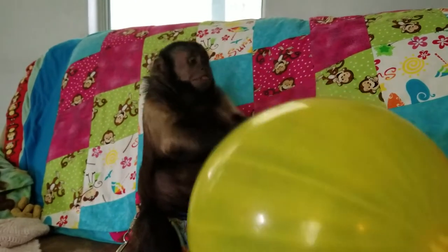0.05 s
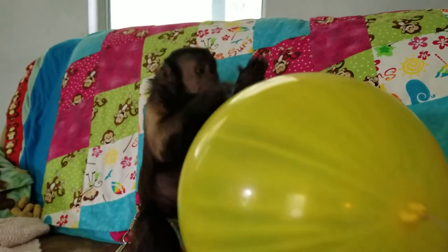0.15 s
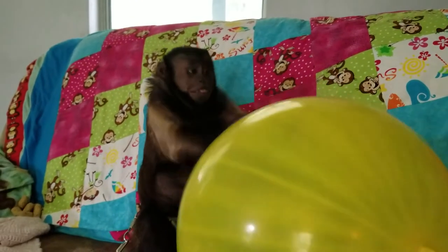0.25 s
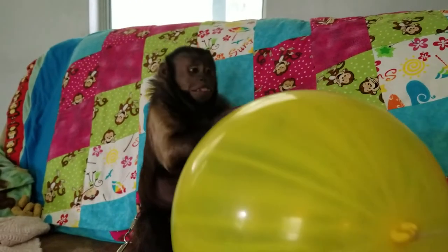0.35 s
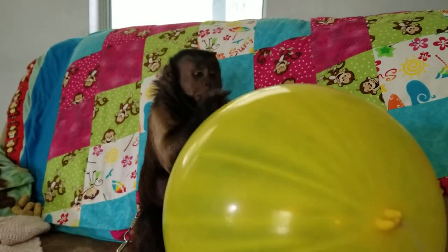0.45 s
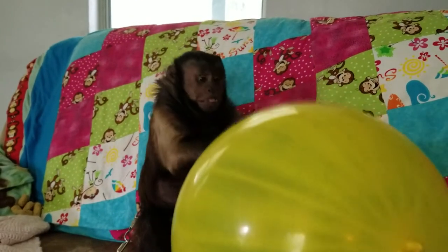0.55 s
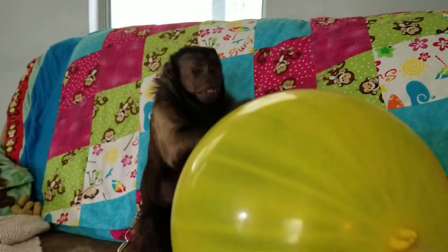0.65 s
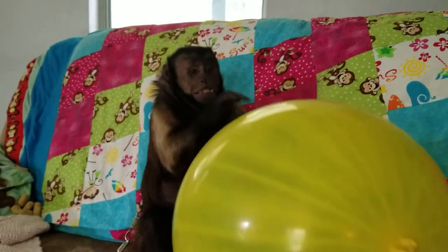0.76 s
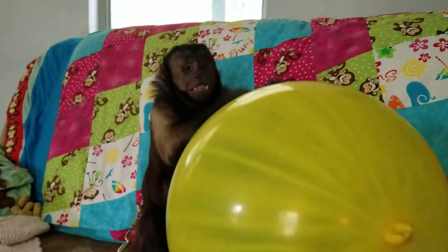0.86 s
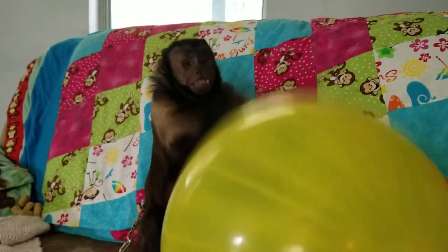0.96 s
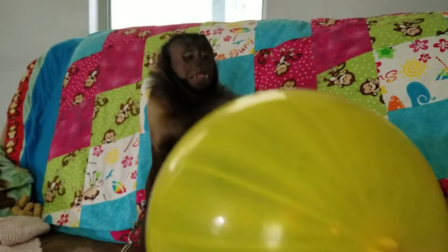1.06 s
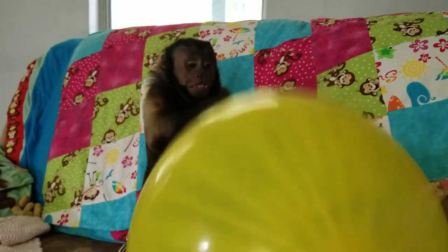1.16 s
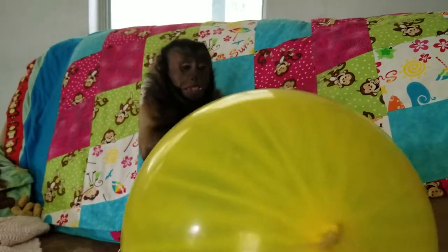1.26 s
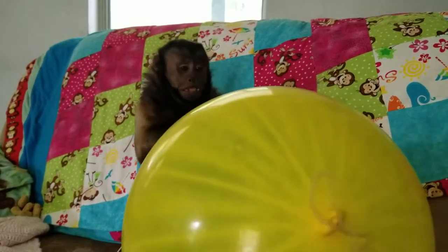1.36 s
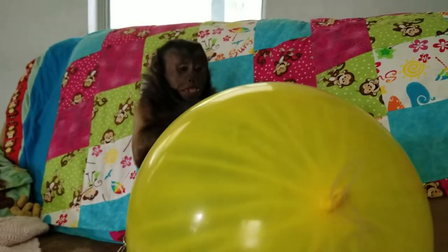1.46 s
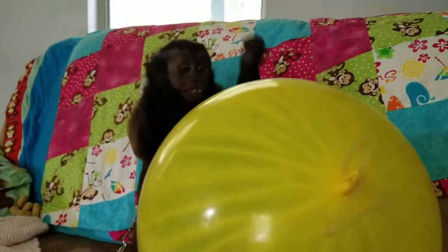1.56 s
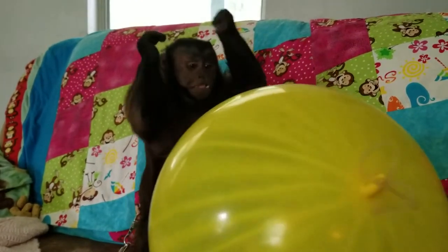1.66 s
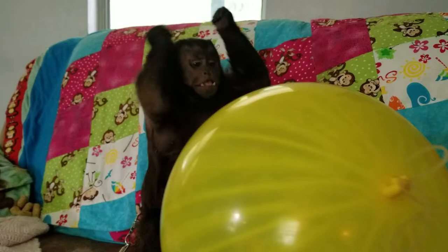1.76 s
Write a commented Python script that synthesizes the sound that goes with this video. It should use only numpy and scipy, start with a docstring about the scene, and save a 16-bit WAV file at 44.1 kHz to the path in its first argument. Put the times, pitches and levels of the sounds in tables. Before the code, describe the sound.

A big latex balloon thumps and scrapes close up as a monkey paws it. A strong hollow thump with rubbery snaps lands at about 0.25 seconds, followed by softer pats and rubs from 0.5 to 0.9. More ringing shoves come around 1 second, and another strong thump with scraping and snaps at 1.2. Light knocks follow near 1.5 seconds, leaving faint room hiss and hum.

```python
"""Hollow, rubbery thumps and scrapes, close up: a monkey paws a big latex balloon on a couch.
Each shove thumps the skin and rings the balloon's low modes. Fur and fingers scrape over the latex in
tiny slips that shake the skin and ring the air inside, and now and then a fingertip snaps free.
Underneath lie the steady hiss and faint hum of a small living room."""
import sys
import numpy as np
from scipy import signal
from scipy.fft import rfft, irfft
from scipy.io import wavfile
from scipy.ndimage import uniform_filter1d

SR = 44100
rng = np.random.default_rng(int(sys.argv[2]) if len(sys.argv) > 2 else 0)


def store_wav(level_fs):
    """Save 16-bit WAV to argv[1]."""
    pcm = np.round(np.clip(np.atleast_2d(level_fs), -1, 1) * 32767)
    wavfile.write(sys.argv[1], SR, pcm.T.astype(np.int16))


N = 79380

# Tone of the room's hiss. Each row: frequency in Hz, relative level in dB.
HISS_SPECTRUM = [(20, -25), (60, -1.5), (110, -1.5), (170, -10), (235, -5), (370, -12.5), (700, -8),
                 (1200, -7), (1900, -12), (2700, -8.5), (4000, -14.5), (5700, -25), (9000, -32),
                 (15500, -39)]
# Strokes over the latex. Each row: peak time, rise and fall in seconds, then relative scrape level,
# treble tilt and relative skin shake in dB.
PAW_STROKES = [(0.038, 0.033, 0.047, -38.5, 1, -36.5), (0.09, 0.018, 0.022, -42.5, 0, -55),
               (0.232, 0.014, 0.037, -37, 4, -31.5), (0.277, 0.017, 0.019, -27.5, 1, -30.5),
               (.315, 0.0057, 0.0069, -56, -5, -36), (0.363, 0.0045, 0.027, -43.5, -8, -39),
               (0.527, 0.024, 0.035, -45, 9, -36.5), (0.573, 0.026, 0.017, -36.5, 2.5, -33.5),
               (.665, 0.088, 0.065, -50, -7, -49), (0.754, 0.03, 0.033, -42, 2, -40.5),
               (0.798, 0.016, 0.022, -54, 10, -47), (0.868, 0.017, 0.025, -48, 3.5, -43),
               (0.979, 0.025, 0.02, -34, 1.5, -24.5), (0.994, 0.016, 0.04, -43, 6, -39),
               (1.172, 0.025, 0.035, -39, 10, -30), (1.202, 0.02, 0.022, -29, 5.5, -44.5),
               (1.241, 0.012, 0.0064, -34, -10, -31), (1.308, 0.02, 0.04, -53, -12, -42),
               (1.429, 0.018, 0.037, -48.5, -1, -58.5)]
# Tone of the shaken skin. Each row: frequency in Hz, relative level in dB.
RUMBLE_SPECTRUM = [(20, -11), (45, 6.5), (75, 2), (110, -2.5), (170, -4.5), (235, -4), (310, -7),
                   (400, -14.5), (560, -10), (900, -39.5), (2000, -42)]
# Tone of the slips on latex. Each row: frequency in Hz, relative level in dB.
SLIP_SPECTRUM = [(150, -31), (390, 1), (540, 8.5), (950, 5.5), (1300, 3), (2000, 2), (3000, 1.5),
                 (5000, -5), (8000, -11.5), (12000, -14), (16000, -16.5)]
# Resonances of the enclosed air. Each row: frequency in Hz, relative level in dB.
AIR_MODES = [(504, -18), (677, -0.5), (867, -11), (983, -4), (1156, -2), (1359, -1), (1795, 6), (1925, -3),
             (2364, -8), (2741, -4), (3062, -22)]
# Fingertips snapping free. Each row: start in seconds, ring level in dB, the ring's low-pass cutoff
# in Hz, crack level in dB.
FINGER_SNAPS = [(0.2632, -38, 4000, -48), (.2925, -34, 1600, -54), (.313, -39.5, 1600, -48),
                (0.3602, -34.5, 910, -46), (0.573, -34, 2800, -49), (0.9589, -36.5, 1000, -47),
                (0.9724, -30, 3660, -60), (1.19, -42, 3000, -35), (1.202, -27.5, 4000, -49),
                (1.2153, -29.5, 2000, -47), (1.2393, -29.5, 1760, -42), (1.2857, -29, 3600, -46.5),
                (1.536, -41.5, 1000, -70)]
# The taut patch under a fingertip. Each row: frequency in Hz, relative level in dB, T60 in seconds.
PATCH_MODES = [(634, -6, 0.019), (970, -6, 0.015), (1620, 1.5, 0.0063), (2200, 4, 0.0049),
               (2940, -11, 0.012)]
# Light knocks on the balloon. Each row: start in seconds, level in dB.
LIGHT_KNOCKS = [(.034, -29), (1.43, -40.5), (1.5394, -35.5)]
# Shoves and pats. Each row: start in seconds, overall level in dB, swing of the skin in Hz,
# ring level in dB relative to the overall level.
SHOVES = [(0.035, -29.5, 192, -2), (0.054, -34, 79.6, 2.5), (0.132, -33.5, 106, 3.5),
          (0.2236, -20.5, 131, -8), (0.2519, -9, 142.6, -5), (0.2613, -20, 190, 0), (0.31, -29, 164, -10),
          (0.522, -26, 145, -2.5), (.573, -23.5, 62, -2.5), (.606, -36.5, 151, 1), (.658, -34.5, 64, -4),
          (0.746, -24.5, 115, -13), (0.763, -31.5, 53, 1.5), (0.9596, -19, 126, -4),
          (0.9762, -20, 148, 2.5), (.982, -25, 61, 5.5), (1.028, -23, 150, 1.5), (1.047, -30, 66, -3.5),
          (1.157, -21, 150, -10), (1.1791, -8, 146, -5), (1.222, -21.5, 62, -10), (1.258, -28.5, 99.5, -19),
          (1.313, -31, 148, -29), (1.385, -37.5, 161, -1)]
# The whole balloon's low modes. Each row: frequency in Hz, relative level in dB, T60 in seconds.
BALLOON_MODES = [(49.3, -24.5, 0.67), (70.5, -26.5, 0.34), (99, -13.5, 0.47), (129, -12, 0.14),
                 (173, -26.5, 0.092), (230.8, -12, 0.2), (319, -25, 0.1), (511, -26.5, 0.28),
                 (645, -27, 0.073)]


def undb(db):
    """Decibels to gain."""
    return 10 ** (np.asarray(db) / 20)


def unit(x):
    """Scale to rms 1."""
    return x / np.sqrt(np.mean(x ** 2))


def colour(x, points):
    """EQ a sound with a smooth (Hz, dB) curve."""
    hz, db = np.array(points).T
    f = np.maximum(np.fft.rfftfreq(N, 1 / SR), 1)
    return irfft(rfft(x) * undb(np.interp(np.log(f), np.log(hz), db)), N)


def cut(x, hz, kind, order=2):
    """Low-pass or high-pass."""
    return signal.sosfilt(signal.butter(order, hz, kind, fs=SR, output="sos"), x)


def wobble(rate_hz):
    """Smooth random modulation at rms 1."""
    hold = int(SR / rate_hz)
    steps = rng.standard_normal(N)[np.arange(N) // hold]
    return unit(uniform_filter1d(steps, hold))


def since(start):
    """Seconds since a moment, zero before it."""
    return np.maximum(np.arange(N) / SR - start, 0)


def ring(age, hz, t60):
    """One fading mode."""
    return np.sin(2 * np.pi * hz * age) * np.exp(-np.log(1000) * age / t60)


def stroke(peak, rise, fall):
    """Envelope of a stroke: the hand lands, speeds up, then lets go."""
    speed = np.clip(since(peak - rise) / rise, 0, 1) ** 0.83
    return speed * np.exp(-since(peak) / fall)


def lead_left(x, samples):
    """Stereo pair in which the sound reaches the left microphone first."""
    return np.array([x, np.pad(x, (samples, 0))[:N]])


def pan(left_db):
    """Stereo gains with the left louder by left_db."""
    return undb(np.array([[left_db], [-left_db]]) / 2)


def hum(hz=112, level_db=-62.5):
    """A faint, wavering hum in the room."""
    return undb(level_db + 2 * wobble(5.6)) * np.sqrt(2) * np.sin(2 * np.pi * hz * since(0))


def hiss(mid_db=-51):
    """Steady room tone, centred in the bass and wide on top."""
    mid, side = (colour(rng.standard_normal(N), HISS_SPECTRUM) for _ in range(2))
    width = 1.19 * cut(side, 805, "high", order=1) * np.array([[1], [-1]])
    return undb(mid_db) * (mid + width) / mid.std()


def reflections(x, decay_s, delay_s):
    """A fading cloud of echoes, different at each microphone."""
    age = since(delay_s)
    echo = rng.standard_normal((2, N)) * (age > 0) * np.exp(-age / decay_s)
    echo /= np.sqrt(np.sum(echo ** 2, axis=1, keepdims=True))
    return signal.fftconvolve(x[None], echo, axes=1)[:, :N]


def skin_rumble(trim_db=-0.5, linger=1.46):
    """The dragging hand jolts the slack skin into an uneven rumble that settles slower than the scrape."""
    drag = sum(undb(db) * stroke(s, rise, linger * fall) for s, rise, fall, _, _, db in PAW_STROKES)
    return undb(trim_db) * drag * unit(colour(rng.standard_normal(N), RUMBLE_SPECTRUM))


def rasp(slips_per_s=9000, scatter_db=3):
    """Dense tiny slips of uneven strength, coloured by the latex."""
    slips = (rng.random(N) < slips_per_s / SR) * rng.standard_normal(N)
    slips *= undb(scatter_db * rng.standard_normal(N))
    return unit(colour(slips, SLIP_SPECTRUM))


def scrapes(trim_db=-7.5, treble_hz=5800, grip_hz=299.2, grip_db=1.5):
    """Slips bunched by the changing grip and brightened by fur: direct, scattered left and right."""
    slips = np.array([rasp() for _ in range(3)])
    dull = cut(slips, treble_hz, "low", order=1)
    bright = slips - dull
    force = sum(undb(db) * stroke(s, rise, fall) for s, rise, fall, db, _, _ in PAW_STROKES)
    fur = sum(undb(db + tilt) * stroke(s, rise, fall) for s, rise, fall, db, tilt, _ in PAW_STROKES)
    fur += undb(-56) * np.exp(-since(1.34) / 0.1)  # resting fur rustles between strokes, then fades
    grip = unit(undb(grip_db * np.clip(wobble(grip_hz), -2, 2)))
    return undb(trim_db) * (force * dull * grip + fur * bright * np.sqrt(grip))


def hollow_air(rub, t60_s=0.075, wet_db=-1):
    """The air inside the balloon rings along with whatever rubs its skin."""
    age, damping = since(0), np.log(1000) / t60_s
    modes = sum(undb(db) * np.cos(2 * np.pi * hz * age) for hz, db in AIR_MODES)
    response = 2 * damping / SR * modes * np.exp(-damping * age)
    return rub + undb(wet_db) * signal.fftconvolve(rub, response)[:N]


def snaps(crack_decay_s=0.0017, detune=0.045):
    """A fingertip sticks, then lets a taut patch of latex crack back and ring for an instant."""
    out = np.zeros(N)
    for start, ring_db, cutoff_hz, crack_db in FINGER_SNAPS:
        age = since(start)
        crack = rng.standard_normal(N) * (age > 0) * np.exp(-age / crack_decay_s)
        patch = sum(undb(db) * ring(age, hz * (1 + detune * rng.standard_normal()), t60)
                    for hz, db, t60 in PATCH_MODES)
        patch = cut(patch + 1e-18, cutoff_hz, "low")
        for part, db in ((patch, ring_db), (crack, crack_db)):
            out += undb(db) * part / np.sqrt(np.sum(part ** 2) / (0.003 * SR))  # as if packed into 3 ms
    return out


def knocks(cavity_hz=229, t60_s=0.087):
    """Light knocks ring only the air inside."""
    return sum(undb(db) * ring(since(start), cavity_hz, t60_s) for start, db in LIGHT_KNOCKS)


def thumps(peak_cycles=0.42, width_cycles=0.5, contact_s=0.0031, detune=0.0236):
    """Each shove swings the skin out and back and leaves the balloon ringing."""
    t, out = np.arange(N) / SR, np.zeros(N)
    for start, level_db, swing_hz, ring_db in SHOVES:
        age, cycles = since(start), (t - start) * swing_hz
        swing = np.sin(2 * np.pi * cycles) * np.exp(-((cycles - peak_cycles) / width_cycles) ** 2)
        boom = sum(undb(db) * ring(age, hz * (1 + detune * rng.standard_normal()), t60)
                   for hz, db, t60 in BALLOON_MODES)
        attack = 1 - np.exp(-age / contact_s)
        out += undb(level_db) * (0.7 * swing + undb(ring_db) * boom * attack)
    return out


def scene(crossover_hz=1800, room_t60_s=0.33):
    """The close balloon, leaning a little left, over a short room tail and the room tone."""
    scrape = scrapes()
    skin = hollow_air(scrape[0]) + snaps()
    body = thumps() + knocks() + skin_rumble()
    # Treble comes from the hands on the left; lower sounds spread over the whole balloon ahead.
    lows = irfft(rfft(skin) / (1 + (np.fft.rfftfreq(N, 1 / SR) / crossover_hz) ** 8), N)
    scattered = undb(6.5) * cut(scrape[1:], 1080, "high")  # thrown sideways by the curved skin
    near = lead_left(skin - lows, samples=15) + lead_left(lows, samples=1) + scattered
    close_body = lead_left(body, samples=1) * pan(left_db=2.14)
    couch_bounce = undb(-10) * reflections(cut(body, 214, "high"), decay_s=0.0029, delay_s=0.0011)
    room_send = undb(-8.5) * skin + undb(-16) * body
    room = reflections(room_send, decay_s=room_t60_s / np.log(1000), delay_s=0.012)
    return (near + room) * pan(left_db=0.76) + close_body + couch_bounce + hiss() + hum()


def record(dry):
    """Roll off the subsonics and cut the very top steeply."""
    top_cut = signal.ellip(10, .2, 80, 15900, fs=SR, output="sos")
    return signal.sosfilt(top_cut, cut(dry, 5.3, "high", order=1))


dry = scene()
out = record(dry)
store_wav(out)
```